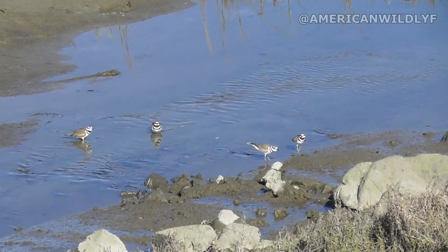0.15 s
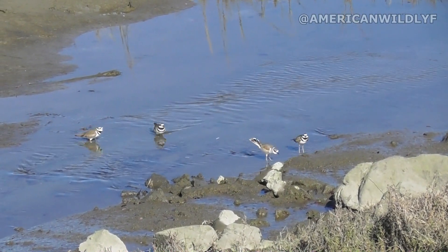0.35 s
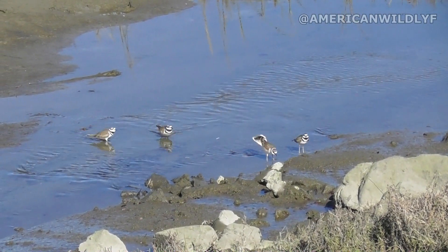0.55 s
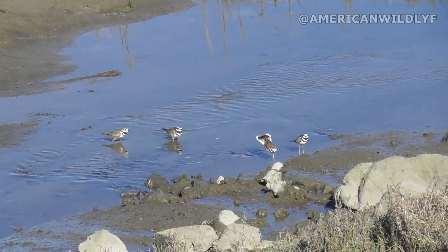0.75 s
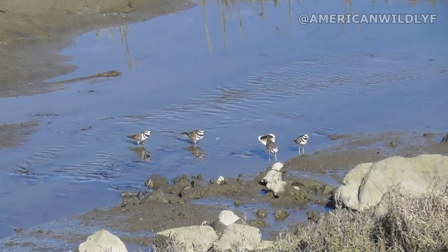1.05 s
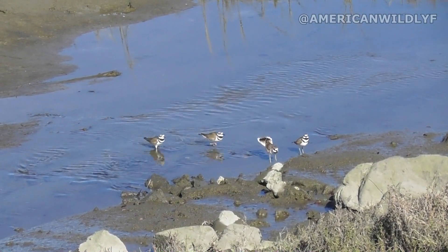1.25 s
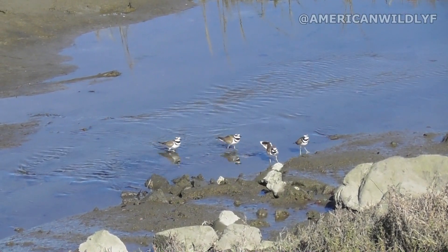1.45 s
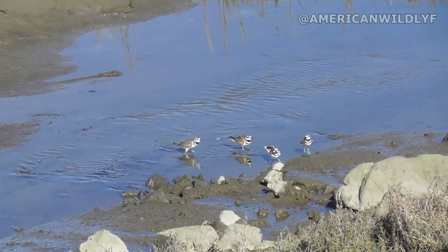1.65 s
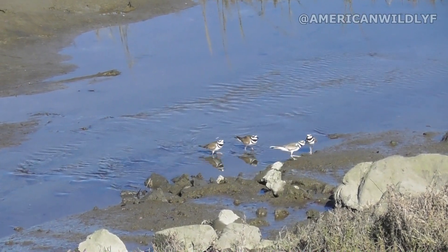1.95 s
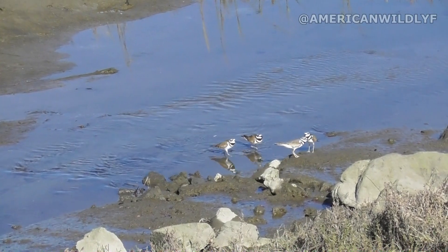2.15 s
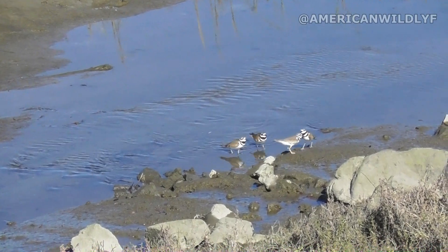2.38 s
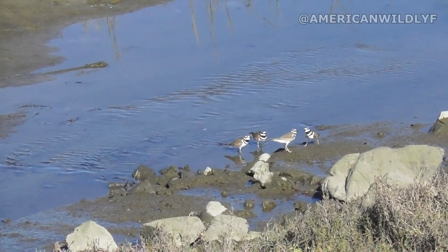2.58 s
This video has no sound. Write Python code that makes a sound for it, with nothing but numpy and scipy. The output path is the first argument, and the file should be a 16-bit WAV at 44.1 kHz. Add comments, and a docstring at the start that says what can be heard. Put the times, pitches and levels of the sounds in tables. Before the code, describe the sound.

Plovers squabbling in quick, shrill peeps and chirps outdoors, over low gusty wind rumble

```python
"""Edge of shallow water: plovers squabble in arched, piping notes that overlap and beat, with hooked
chirps, low peeps, a soft trill of pips and faint far whistles between. Each voice is a stack of harmonics.
Mud and bank return faint echoes and a short scatter; two splashy ticks are bursts of shaped noise.
Shaped stereo noise makes the gusts on the microphone, a low rumble, a deep distant one that grows,
a mid-range rustle and a thin hiss that grows towards the end over a steady faint one."""
import sys
import numpy as np
from scipy import signal
from scipy.fft import rfft, irfft
from scipy.io import wavfile

SR = 44100
rng = np.random.default_rng(int(sys.argv[2]) if len(sys.argv) > 2 else 0)


def unload_audio(sound):
    """Save the sound as a 16-bit wav file, at the path given as the first command line argument."""
    columns = np.transpose(np.atleast_2d(sound))
    # keep every value between -1 and 1, then stretch to whole-number steps
    steps = np.round(np.clip(columns, -1, 1) * 32767)
    wavfile.write(sys.argv[1], SR, steps.astype(np.int16))


N = 119952
TIME = np.arange(N) / SR   # seconds
HZ = np.maximum(np.arange(N // 2 + 1) * SR / N, 1)   # frequency of every spectrum bin

WOBBLE = 0.00624   # spread of the random pitch wobble, as a share of the pitch
FLICKER_DB = 0.7   # spread of the level flicker of rustle and hiss


def from_db(db):
    """Decibels to gain."""
    return 10 ** (np.asarray(db) / 20)


def rms_one(x):
    """Scale to unit power."""
    return x / np.sqrt(np.mean(x ** 2) + 1e-20)


def in_time(rows):
    """A curve of (seconds, value) points, drawn with straight lines at every sample."""
    return np.interp(TIME, *np.transpose(rows))


def in_hz(rows):
    """A curve of (Hz, value) points at every bin, straight over log frequency."""
    hz, value = np.transpose(rows)
    return np.interp(np.log(HZ), np.log(hz), value)


def drift(rate_hz):
    """Smooth random motion with spread 1: noise rolled off around the given rate."""
    return rms_one(irfft(rfft(rng.standard_normal(N)) / (1 + (HZ / rate_hz) ** 2), N))


def birds():
    """Piping notes, trill pips, low peeps, hooked chirps and birds farther off."""
    return piping() + trill() + peeps() + chirps() + far_whistles()


def piping():
    """Overlapping arched notes; close pitches beat against each other."""
    # Each row: start in seconds, length in seconds, share of the note before its top, top pitch in Hz,
    # rise in Hz, fall in Hz, then the relative levels of harmonics 1 to 5 in dB.
    piping_notes = [ (-.01, 0.061, 0.64, 1917, 85, 170, -59, -39, -84, -61, -61),
                    (.011, 0.047, .38, 1977, 123, 150, -67, -42, -60, -50, -66),
                    (.151, 0.052, 0.42, 1978, 120, 150, -54, -42, -63, -48, -63.5),
                    (.276, .064, 0.168, 2100, 51, 197.4, -47, -39, -62, -55.5, -64),
                    (.293, 0.053, 0.48, 1992, 89, 205, -52, -34.5, -61, -53, -59.5),
                    (.47, 0.051, 0.39, 1960, 61, 102, -61, -35.5, -56.5, -50.5, -61),
                    (.521, 0.071, 0.3, 2078, 210, 213, -42, -28.5, -57.5, -54.5, -62.5),
                    (0.642, 0.041, 0.43, 2004, 75, 124, -69, -38, -66, -50.5, -60.5),
                    (.805, 0.062, 0.18, 2079, 385, 100, -65, -34.5, -69, -51.5, -72),
                    (.827, .056, 0.31, 2002, 75, 201, -57, -40, -75, -57, -66),
                    (1.072, 0.05, .42, 1990, 106, 120, -56, -32.5, -57, -53, -58),
                    (1.079, 0.07, 0.44, 2042, 72, 280, -44.5, -35.5, -53, -55.5, -70),
                    (1.341, 0.032, .25, 1932, 65, 130, -68, -42, -66, -52, -54.5),
                    (1.363, 0.033, .2, 1896, 32, 115, -71, -40.5, -66, -48.5, -57),
                    (1.374, .070, .2, 2098, 124, 299, -54.5, -40, -51, -53, -66),
                    (1.403, .022, 0.26, 1922, 33, 150, -65, -33, -67, -44, -53),
                    (1.506, 0.0275, 0.44, 1835, 122, 70, -74, -40, -63, -55, -67),
                    (1.518, 0.041, 0.18, 1919, 120, 137, -66, -32.5, -57, -52.5, -62),
                    (1.664, 0.062, 0.37, 1981, 216, 179, -57, -37, -57, -53, -57),
                    (1.682, 0.062, 0.28, 1970, 71, 180, -54, -41, -69, -56, -62),
                    (1.882, .042, 0.25, 1890, 117, 160, -77, -34.5, -51, -48.5, -58),
                    (1.890, 0.059, 0.46, 1988, 115, 91, -50.5, -43.5, -56, -49.5, -55),
                    (1.925, 0.032, 0.14, 1950, 10, 190, -52, -36.5, -50, -44.5, -52),
                    (2.022, 0.053, .3, 1995, 130, 221, -57, -30.5, -54, -49.5, -60),
                    (2.119, 0.07, 0.42, 1887, 96, 129, -57, -39.5, -58, -49, -62),
                    (2.173, 0.053, 0.35, 2001, 185, 183, -54, -29.5, -58, -52, -61),
                    (2.321, 0.058, 0.24, 2013, 166, 193, -52, -32, -62, -53, -58),
                    (2.369, 0.063, 0.36, 1958, 52, 181, -47.5, -37, -53.5, -52, -63),
                    (2.479, .055, .3, 1945, 102, 202, -54.5, -34, -61, -55, -66),
                    (2.615, 0.039, 0.18, 1868, 11, 60, -57, -47.5, -59, -54, -64),
                    (2.657, 0.045, 0.42, 1884, 83, 176, -63, -33.5, -63, -54, -60)]
    return sum(note(start, length, top_at, top_hz, rise_hz, fall_hz, levels_db)
               for start, length, top_at, top_hz, rise_hz, fall_hz, *levels_db in piping_notes)


def trill():
    """A run of short pips, each a small, shallow version of the piping note."""
    # Each row: start in seconds, top pitch in Hz, relative level in dB.
    pips = [(1.456, 1780, -43), (1.488, 1760, -42.5), (1.558, 1740, -40), (1.588, 1754, -43),
            (1.621, 1790, -48), (1.649, 1770, -47), (1.719, 1863, -38), (1.753, 1890, -40),
            (1.790, 1875, -47), (1.820, 1885, -46), (1.849, 1873, -42.5), (1.958, 1922, -34.5),
            (1.990, 1956, -36.5)]
    # Harmonics 1 to 5 against the level of the pip, in dB.
    harmonics_db = np.array([-18, -2, -20.5, -18.5, -21.5])
    return sum(note(start, 0.018, 0.22, top_hz, rise_hz=15, fall_hz=60.3, levels_db=db + harmonics_db)
               for start, top_hz, db in pips)


def peeps():
    """Soft low notes scattered between the piping."""
    # Each row: start in seconds, length in seconds, lowest pitch in Hz, relative level in dB.
    peep_rows = [(0.036, 0.042, 1725, -47), (0.218, 0.053, 1716, -48), (0.413, .048, 1700, -46),
                 (0.603, 0.041, 1690, -43), (1.213, 0.022, 1683, -53), (1.256, 0.026, 1725, -50.5)]
    return sum(peep(*row) for row in peep_rows)


def chirps():
    """Hooked chirps, louder than the peeps."""
    # Each row: start of the hook in seconds, low lead-in, hook length and low tail in seconds,
    # top pitch in Hz, relative level of the hook in dB.
    chirp_rows = [(0.75, 0.011, 0.017, 0.013, 1857, -36.5), (.897, 0.0075, 0.025, 0.012, 1940, -31),
                  (1.012, .005, .031, 0.017, 1994, -33), (1.156, 0.0021, 0.033, 0.0027, 1947, -35)]
    return sum(chirp(*row) for row in chirp_rows)


def far_whistles():
    """Faint gliding whistles from farther off."""
    # Each row: start in seconds, length in seconds, from Hz, to Hz, peak level in dB.
    whistle_rows = [(.052, 0.043, 6340, 4650, -61), (1.12, .065, 4800, 5200, -59),
                    (1.476, 0.048, 4280, 4120, -49), (2.12, 0.67, 2216, 2494, -58)]
    return sum(far_whistle(*row) for row in whistle_rows)


def note(start, length, top_at, top_hz, rise_hz, fall_hz, levels_db):
    """A piping note: the pitch jumps up to its top and sags; the level swells, then fades."""
    part = np.linspace(0, 1, int(length * SR))
    rising = np.maximum(1 - part / top_at, 0)   # 1 at the start, 0 at the top
    falling = np.maximum((part - top_at) / (1 - top_at), 0)   # 0 at the top, 1 at the end
    hz = top_hz - rise_hz * rising ** 2.22 - fall_hz * falling ** 1.596
    swell_db = -6.5 * rising - 7 * falling ** 2
    dulling_db = 2 * (rising ** 2 + falling ** 2)   # overtones are strongest at the top of the arch
    # the sixth and seventh harmonics hang below the fifth
    levels_db = [*levels_db, levels_db[-1] - 6, levels_db[-1] - 18]
    return voice(start, hz, swell_db, levels_db, dulling_db)


def peep(start, length, low_hz, db):
    """A soft low note: the pitch dips in the middle, where it is loudest."""
    # Harmonics 1 to 5 against the level of the peep, in dB.
    harmonics_db = [-18, -0.5, -29, -37, -27]
    edge = np.linspace(-1, 1, int(length * SR)) ** 2
    return voice(start, low_hz + 45.5 * edge, db - 2.5 * edge, harmonics_db, 0)


def chirp(start, lead, length, tail, top_hz, db):
    """A soft low tone flips up into a loud hook, slides back and lingers."""
    # Harmonics 1 to 6 against the level of the chirp, in dB.
    harmonics_db = [-19, 0, -34, -20, -24, -26.5]
    low_hz, low_db = 1704, -47.5
    top_at = 0.27   # share of the hook before its top
    part = np.clip(np.arange(-lead, length + tail, 1 / SR) / length, 0, 1)
    flip_up = np.sin(np.pi / 2 * part / top_at) ** 2
    slide_back = np.cos(np.pi / 2 * (part - top_at) / (1 - top_at))
    hook = np.where(part < top_at, flip_up, slide_back)
    gain = from_db(low_db) * (1 - hook) + from_db(db) * hook
    hz = low_hz + (top_hz - low_hz) * hook
    dulling_db = 2 * (1 - hook)   # the low tone has weaker overtones than the hook
    return voice(start - lead, hz, 20 * np.log10(gain), harmonics_db, dulling_db)


def voice(start, hz, swell_db, levels_db, dulling_db):
    """A whistle of locked harmonics on a pitch and a loudness contour; the second carries it."""
    attack_s, release_s = 0.0022, 0.0037
    birds_db = 1.5   # gain of all voices
    chance = rng.standard_normal((9, 400))
    t = np.arange(len(hz)) / SR

    def wander(row, draws_per_s):
        return np.interp(t * draws_per_s, np.arange(len(row)), row)

    wobbling_hz = hz * (1 + WOBBLE * wander(chance[0], 245))
    rasp = 0.031 * wander(chance[1], 1500)   # fast phase roughness, radians
    phase = 2 * np.pi * np.cumsum(wobbling_hz) / SR + rasp
    edges = np.clip(t / attack_s, 0, 1) * np.clip((t[-1] - t) / release_s, 0, 1)
    swell = edges * from_db(birds_db + swell_db)
    tone = 0
    for k, (db, row) in enumerate(zip(levels_db, chance[2:]), 1):
        if k > 2:   # overtones flutter more, and dull with the contour
            db = db - 1 + 3.2 * wander(row, 105) - dulling_db
        else:
            db = db + 0.93 * wander(row, 130)
        tone = tone + from_db(db) * np.sin(k * phase)
    return np.interp(TIME - start, t, np.sqrt(2) * swell * tone, left=0, right=0)


def far_whistle(start, length, from_hz, to_hz, db):
    """A faint glide: one wobbling sine that swells and fades."""
    part = np.clip((TIME - start) / length, 0, 1)
    hz = (from_hz + (to_hz - from_hz) * part) * (1 + WOBBLE * drift(65))
    return from_db(db) * np.sin(np.pi * part) * np.sin(2 * np.pi * np.cumsum(hz) / SR)


def ticks():
    """Brief bright spatters: shaped noise that starts at once and dies at once."""
    # Each row: start in seconds, level in dB.
    spatters = [(.741, -51), (2.622, -53)]
    # Tone of the spatter. Each row: frequency in Hz, relative level in dB.
    spectrum = [(1000, -29), (4000, -14), (5500, -4), (11000, 7), (13000, -16), (16000, -30)]
    decay_s = 0.0062
    level = sum(from_db(db) * (TIME >= start) * np.exp(-np.abs(TIME - start) / decay_s)
                for start, db in spatters)
    noise = irfft(rfft(rng.standard_normal(N)) * from_db(in_hz(spectrum)), N)
    return level * rms_one(noise)


def shore(x):
    """Distinct echoes from mud and bank, and a short decaying scatter from stones and grass."""
    # Each row: delay in seconds, level against the direct sound in dB.
    echoes = [(.021, -25.5), (.056, -28)]
    # Tone of the scatter. Each row: frequency in Hz, level against the direct sound in dB.
    scatter_tone = [(2000, -7.5), (4000, -12), (5800, -8), (7700, -27), (10000, -27), (15000, -21)]
    t60_s = 0.18   # time to fall by 60 dB
    tail = rng.standard_normal(N) * from_db(-60 * TIME / t60_s)
    coloured = irfft(rfft(x) * from_db(in_hz(scatter_tone)), N)
    scatter = signal.fftconvolve(coloured, tail / np.linalg.norm(tail))[:N]
    return scatter + sum(from_db(db) * np.interp(TIME - delay, TIME, x, left=0) for delay, db in echoes)


def wind():
    """Crackling gusts, the rumbles under them, a far rustle, the thin hiss above and a steady floor."""
    return gusts() + rumble() + far_rumble() + rustle() + hiss() + steady_floor()


def gusts():
    """Wind on the microphone: low-mid noise on a jumping level, crackling with small eddies."""
    # Each row: time in seconds, relative level in dB.
    level = [(0.0, -32.5), (0.04, -37), (0.15, -35.5), (0.175, -30), (0.27, -26.5), (0.29, -32),
             (0.38, -35), (0.44, -43), (0.77, -44.5), (0.97, -40.5), (0.98, -48.5), (1.14, -49.5),
             (1.18, -34), (1.29, -30.5), (1.3, -39), (1.33, -30.5), (1.42, -34.5), (1.43, -29.5),
             (1.61, -47.5), (1.74, -38.5), (1.8, -33), (1.94, -47.5), (2.26, -48.5), (2.27, -39),
             (2.34, -51), (2.72, -55.5)]
    # Each row: frequency in Hz, relative density in dB.
    spectrum = [(25, -66), (60, -38), (150, -7.5), (300, 4), (520, -1), (900, -7), (1300, -12.5),
                (2000, -18.5), (3000, -32), (5000, -62), (9000, -62), (16000, -81)]
    return air(spectrum, in_time(level) + 0.06 + eddies(), side_db=1.5)


def eddies():
    """Level in dB of small eddies that slap the microphone at once and die away: a gust's crackle."""
    slaps_per_s, decay_s, strength = 260, 0.002, 1.1
    slaps = (rng.random(N) < slaps_per_s / SR) * rng.uniform(0, 1, N)
    push = signal.lfilter([1], [1, -np.exp(-1 / (decay_s * SR))], slaps)
    return 20 * np.log10(rms_one(1 + strength * push))


def rumble():
    """Low noise under the gusts, on a jumping and gently swaying level."""
    # Each row: time in seconds, relative level in dB.
    level = [(0.0, -38), (0.07, -32.5), (0.33, -36), (0.51, -43.5), (0.53, -34), (0.61, -41.5),
             (0.65, -33.5), (0.81, -45.5), (0.98, -36), (1.01, -44.5), (1.08, -30), (1.12, -49),
             (1.19, -31.5), (1.28, -33.5), (1.31, -43), (1.38, -33.5), (1.42, -44), (1.45, -34),
             (1.53, -52.5), (1.85, -38), (1.99, -49.5), (2.07, -35.5), (2.14, -45), (2.4, -43), (2.48, -40),
             (2.72, -46)]
    # Each row: frequency in Hz, relative density in dB.
    spectrum = [(20, -58), (35, -48), (55, -21), (100, -9), (160, 1), (230, 2.5), (400, -7.5), (800, -36.5),
                (2000, -49), (6000, -97)]
    return air(spectrum, in_time(level) - 2 + 0.5 * drift(5.9), side_db=-3.5)


def far_rumble():
    """Deep, distant noise that slowly grows."""
    # Each row: time in seconds, relative level in dB.
    level = [(0, -63), (2.72, -47)]
    # Each row: frequency in Hz, relative density in dB.
    spectrum = [(30, -33), (65, -7), (130, 9), (400, -41)]
    return air(spectrum, in_time(level), side_db=-8)


def rustle():
    """Flickering mid-range noise, nearly all in the centre."""
    # Each row: time in seconds, relative level in dB.
    level = [(0, -65), (.5, -55.5), (.8, -60), (1.1, -52), (1.4, -69), (1.6, -51), (1.9, -58.5),
             (2.3, -49.5), (2.72, -50)]
    # Each row: frequency in Hz, relative density in dB.
    spectrum = [(100, -9), (500, 6), (1000, -6), (1600, 1.5), (2200, -1.5), (2700, -9), (3300, -55),
                (4700, -33), (9000, -58)]
    return air(spectrum, in_time(level) + FLICKER_DB * drift(30), side_db=-29)


def hiss():
    """Thin, flickering broad noise that grows towards the end."""
    # Each row: time in seconds, relative level in dB.
    level = [(0, -73), (.4, -65), (.6, -59.5), (1.3, -63.5), (1.6, -59), (1.9, -55.5), (2.25, -54),
             (2.6, -50.5), (2.72, -53)]
    # Each row: frequency in Hz, relative density in dB.
    spectrum = [(40, 1), (1000, 12), (2800, 4), (3800, 10), (4700, 2), (7100, 0.5), (7700, 11),
                (8300, -0.5), (10000, -2), (12000, -17), (15500, -29)]
    return air(spectrum, in_time(level) + 1.5 + FLICKER_DB * drift(27), side_db=-16)


def steady_floor():
    """A faint noise floor at a constant level."""
    # Each row: frequency in Hz, relative density in dB.
    spectrum = [(9000, -9), (16000, -13)]
    return air(spectrum, -68, side_db=-26)


def air(spectrum, level_db, side_db):
    """Stereo noise on a level curve: notched in the centre, smooth and lagging at the sides."""
    # Depth of the centre notches. Each row: frequency in Hz, depth from 0 to 1.
    notch_depth = [(100, 0.07), (300, 0.7), (1100, 0.71), (2500, 0.72), (4000, 0.53), (9000, 0.1)]
    # Stereo width. Each row: frequency in Hz, side against centre in dB, before side_db.
    width = [(50, -14), (120, -10), (300, -7.5), (600, -1), (1400, -3.5), (2000, -10.5), (3000, -10),
             (5000, -27), (12000, 1.5)]
    first_notch_hz, spacing_hz = 312.5, 403.4   # spacing before crowding
    crowding = 0.012   # the notches crowd together higher up
    side_lag_rad, loose_side_db = 1.16, -1   # loose: side noise of its own, against the shared noise

    shape = rms_one(from_db(in_hz(spectrum)))
    shared, loose = rfft(rng.standard_normal((2, N)) * from_db(level_db)) * shape
    turns = (HZ - first_notch_hz) / spacing_hz
    turns = turns * (1 + crowding * np.minimum(turns, 10))
    # each whole turn cancels: a comb of notches
    notches = 1 - np.clip(in_hz(notch_depth), 0, 1) * np.exp(-2j * np.pi * turns)
    mid = irfft(shared * notches, N)
    side_mix = shared * np.exp(-1j * side_lag_rad) + from_db(loose_side_db) * loose
    side = irfft(side_mix * from_db(in_hz(width) + side_db), N)
    return np.array([mid + side, mid - side])


def scene():
    """The birds and ticks straight ahead with their echoes, the wind all round."""
    calls = birds() + ticks()
    return calls + shore(calls) + wind()


def record(dry):
    """The top is cut steeply: 70 dB down from 16.4 kHz."""
    return signal.sosfilt(signal.cheby2(16, 70, 16400, fs=SR, output="sos"), dry)


dry = scene()
out = record(dry)
unload_audio(out)
```